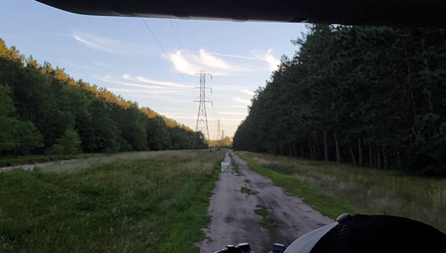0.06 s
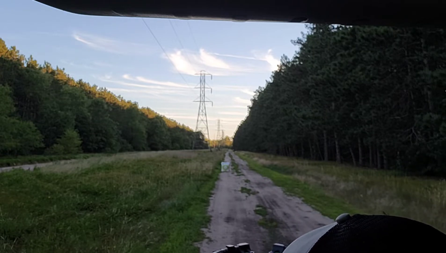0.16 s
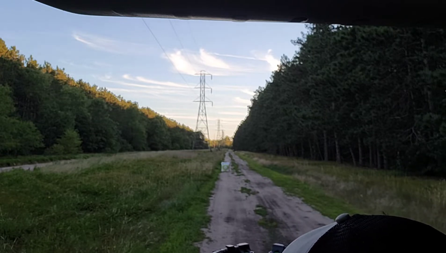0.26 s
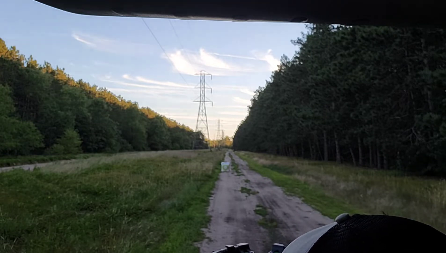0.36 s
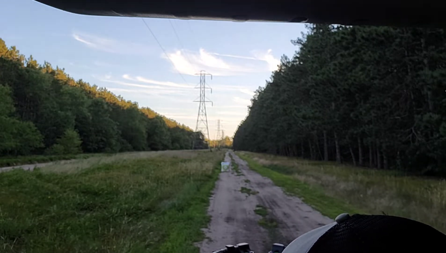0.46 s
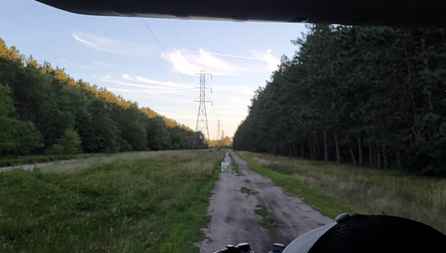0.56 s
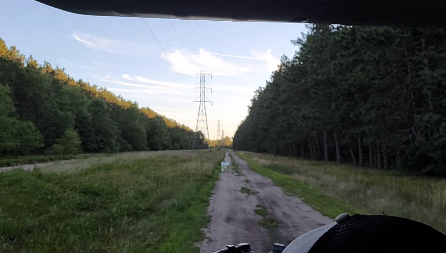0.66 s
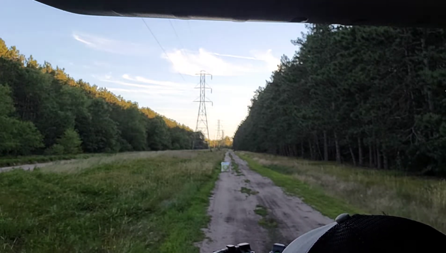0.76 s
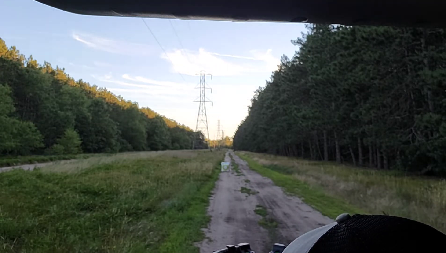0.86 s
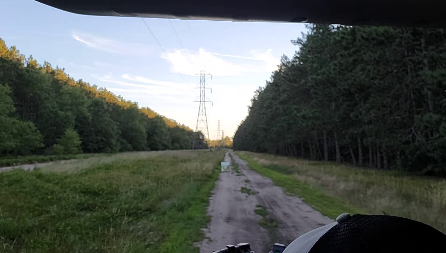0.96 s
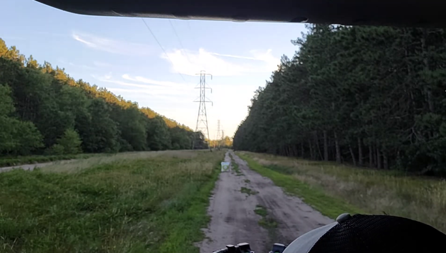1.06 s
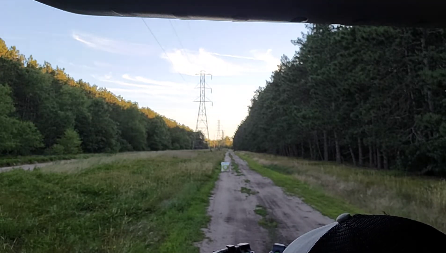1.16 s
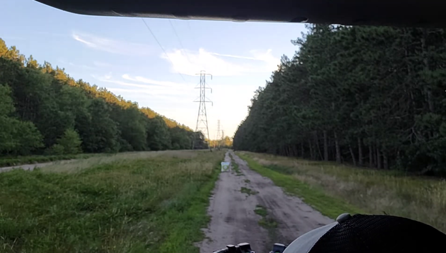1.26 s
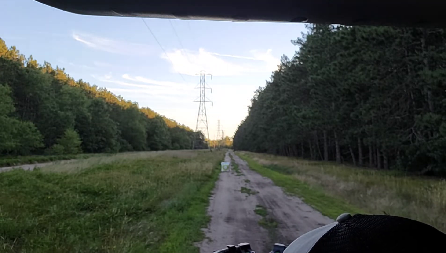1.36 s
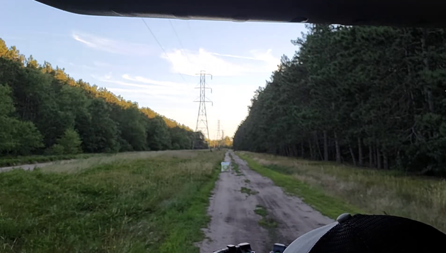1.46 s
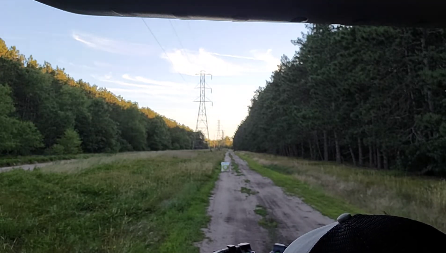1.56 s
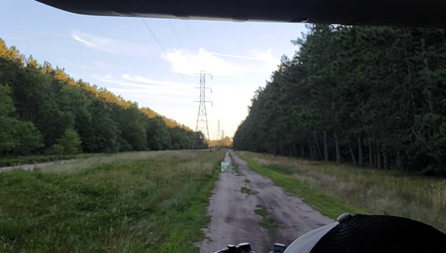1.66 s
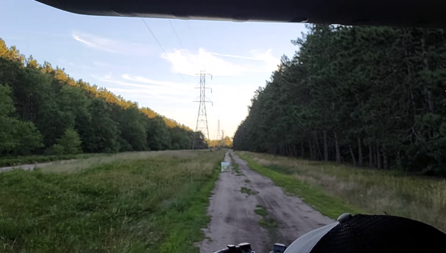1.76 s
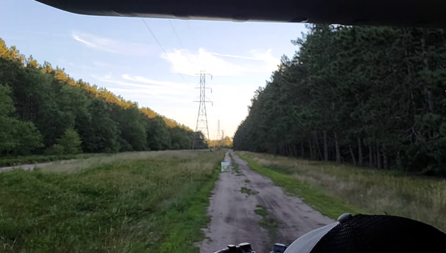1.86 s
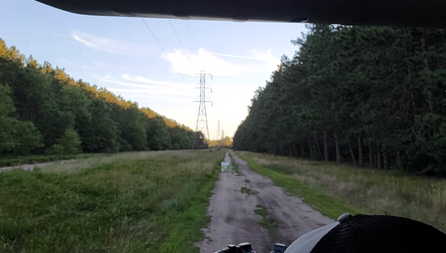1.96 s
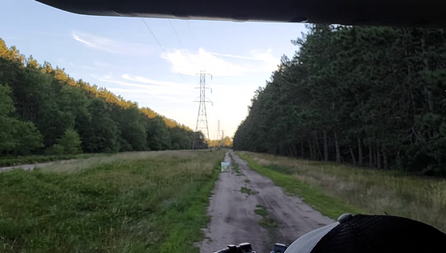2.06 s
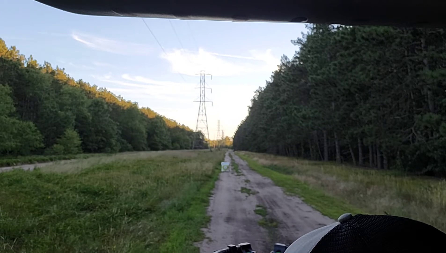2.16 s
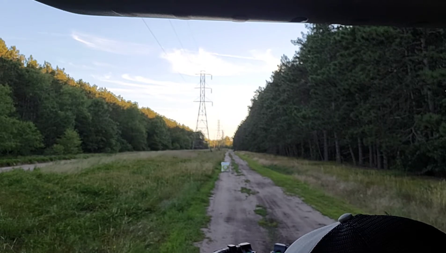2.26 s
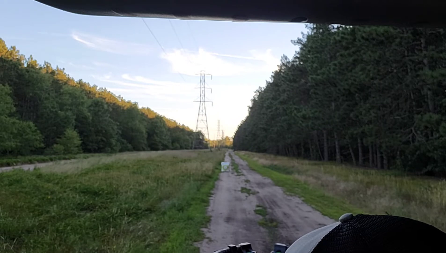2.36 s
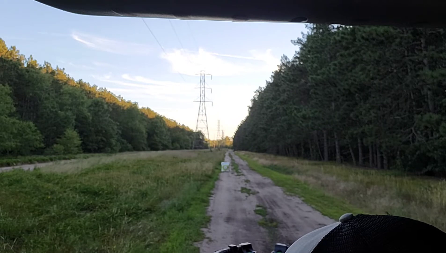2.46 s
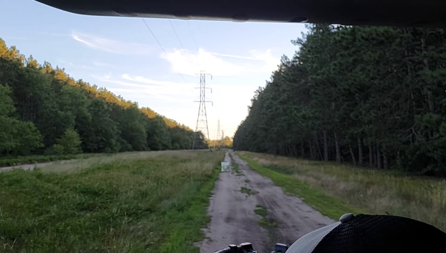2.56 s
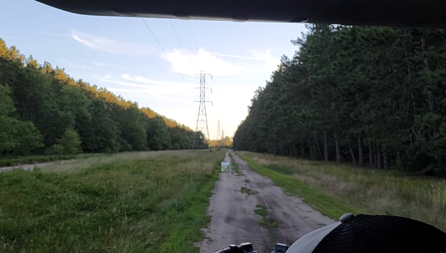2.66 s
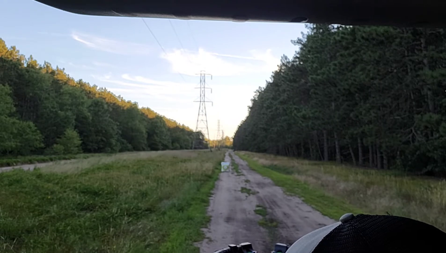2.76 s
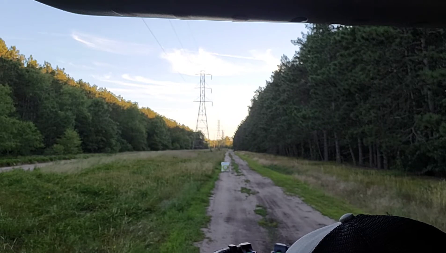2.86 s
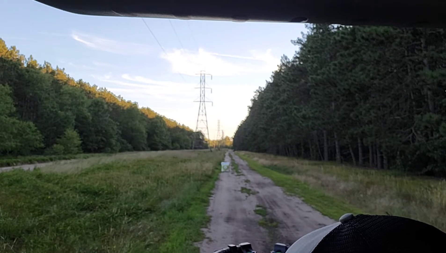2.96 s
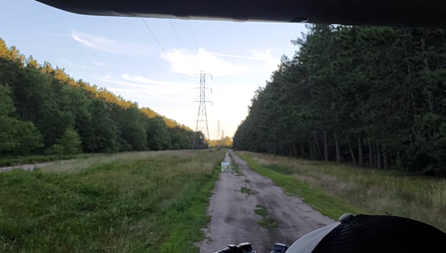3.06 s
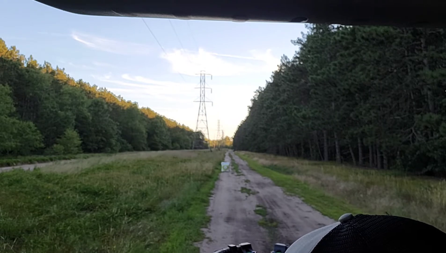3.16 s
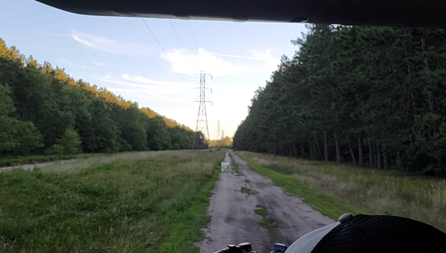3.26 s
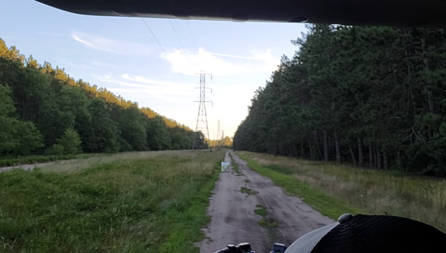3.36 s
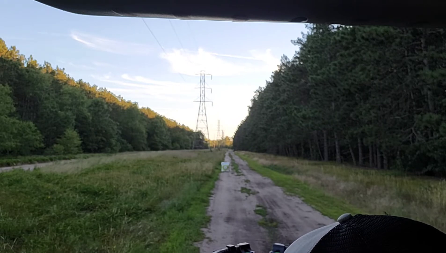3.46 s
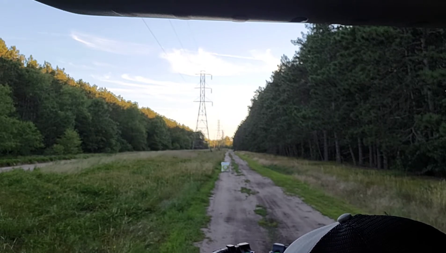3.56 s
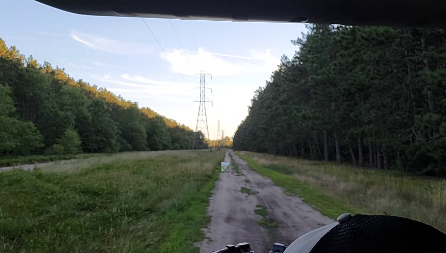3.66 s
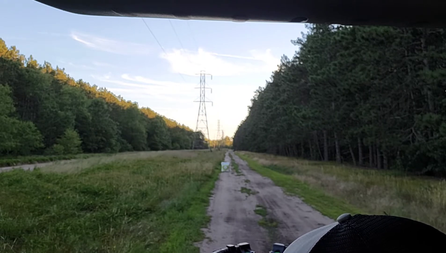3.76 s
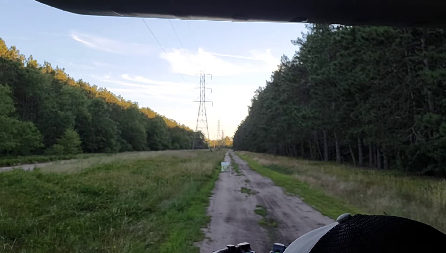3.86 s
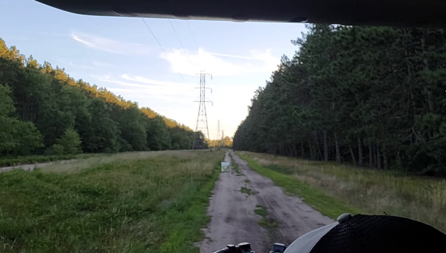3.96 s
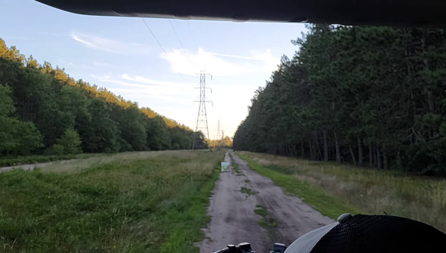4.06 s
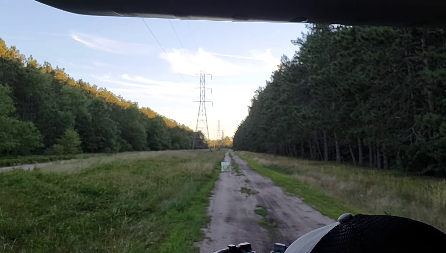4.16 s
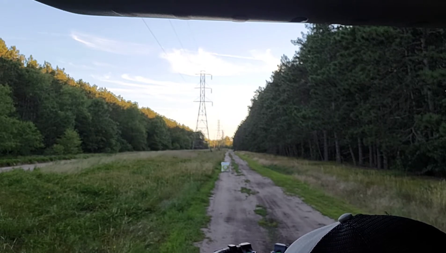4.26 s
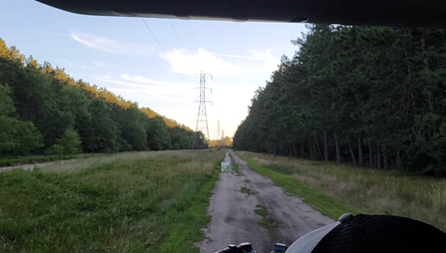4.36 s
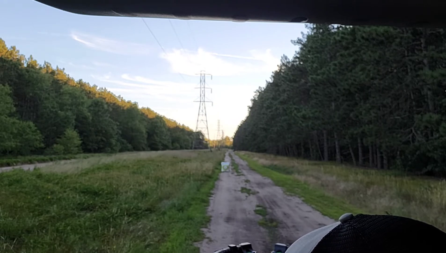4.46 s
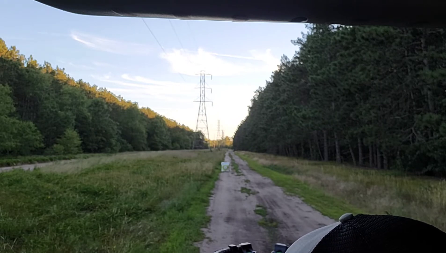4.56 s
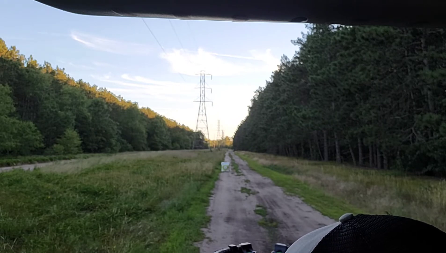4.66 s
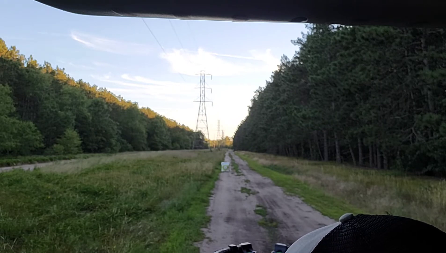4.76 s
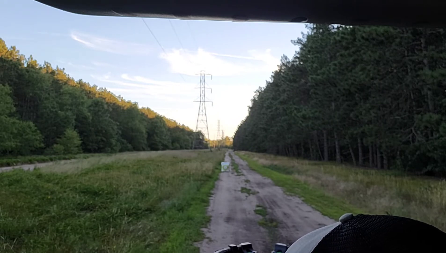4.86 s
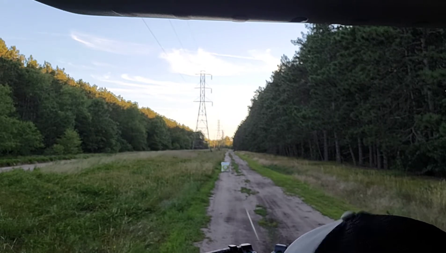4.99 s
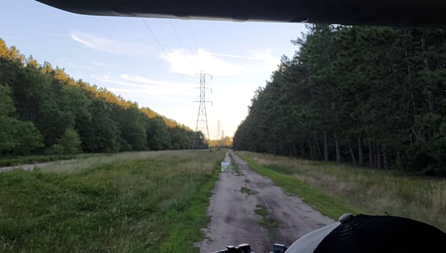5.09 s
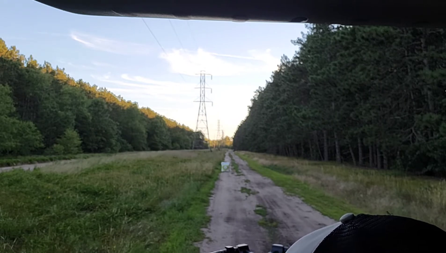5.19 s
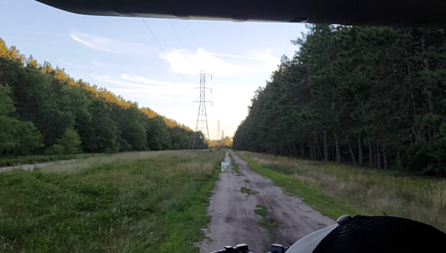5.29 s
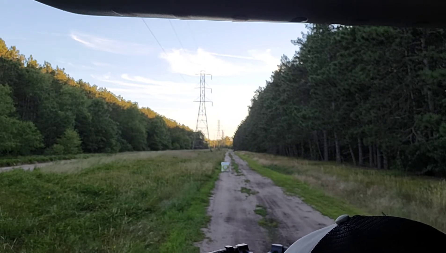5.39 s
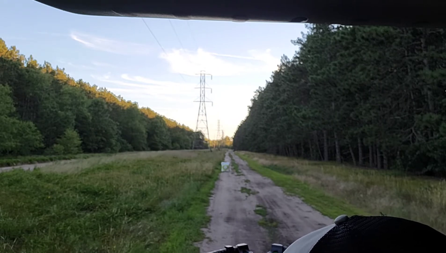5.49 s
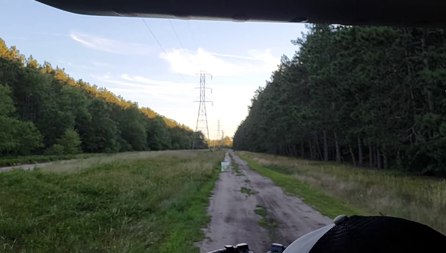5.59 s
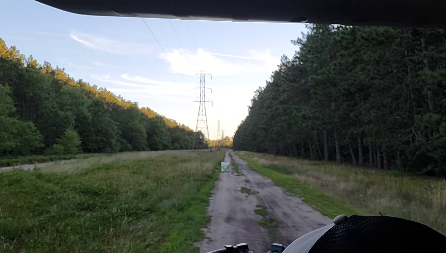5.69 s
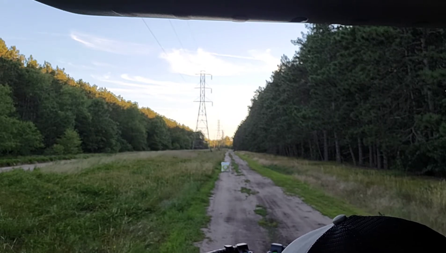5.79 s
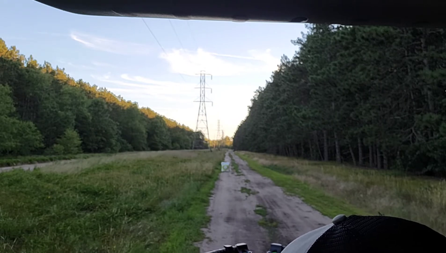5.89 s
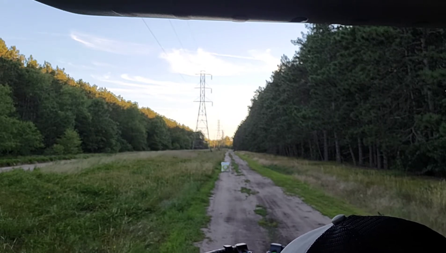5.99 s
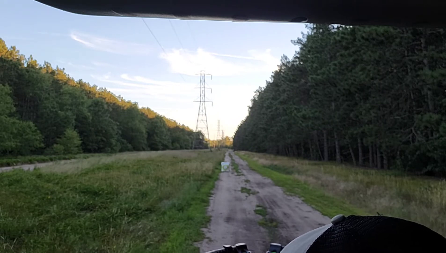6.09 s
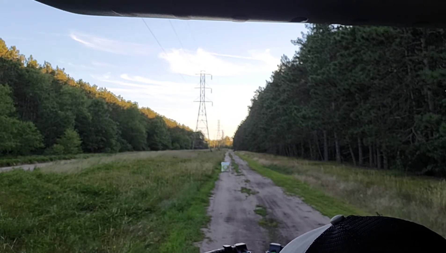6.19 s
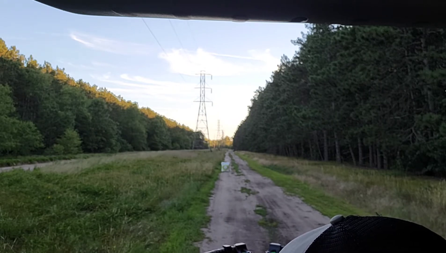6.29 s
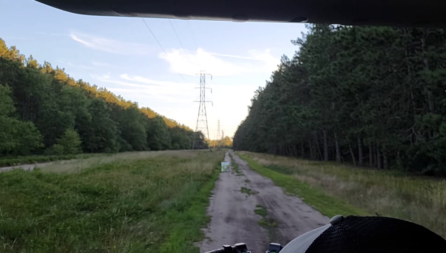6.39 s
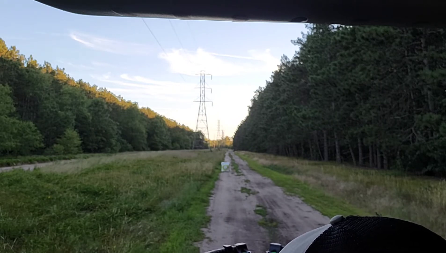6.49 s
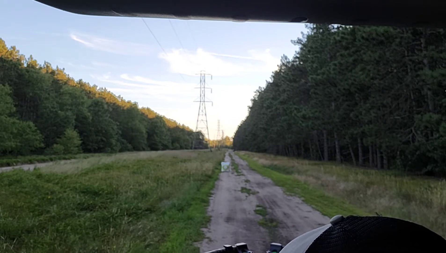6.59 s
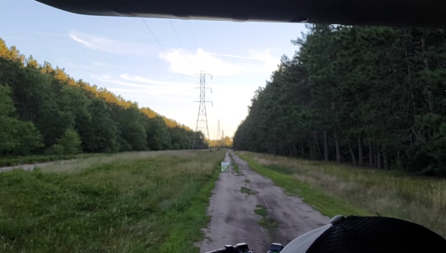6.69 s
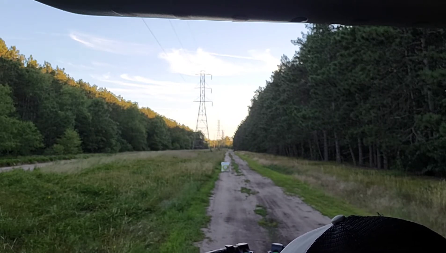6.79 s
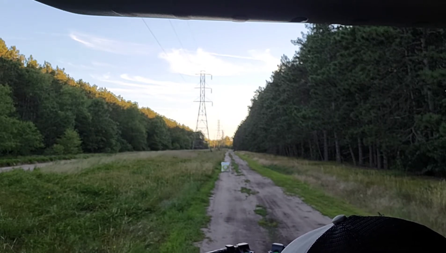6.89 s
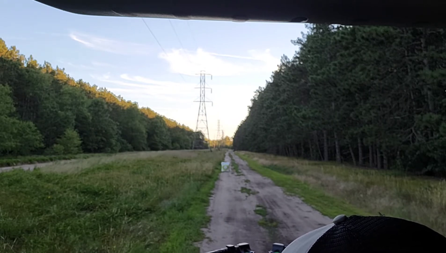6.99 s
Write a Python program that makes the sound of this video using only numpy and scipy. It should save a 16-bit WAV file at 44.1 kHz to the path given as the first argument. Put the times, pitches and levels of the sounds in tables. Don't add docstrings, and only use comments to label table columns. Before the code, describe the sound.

Outdoors in a grassy lane between trees, a parked two-cylinder engine putters low and unevenly under soft air hiss. A cricket chirps faintly and tiny gear ticks sound close to the microphone. After five seconds a crossbow fires with a loud, dry crack and woody knock; a third of a second later the bolt smacks a target. Echoes roll off the trees while the background dips, then slowly returns.

```python
import sys
import numpy as np
from scipy import signal
from scipy.fft import rfft, irfft
from scipy.io import wavfile

SR = 44100
rng = np.random.default_rng(int(sys.argv[2]) if len(sys.argv) > 2 else 0)


def volts_from_decibels(level):
    exponent = np.asarray(level, float) / 20
    return 10 ** exponent


def pcm_store(signal):
    levels = np.round(np.clip(np.atleast_2d(signal), -1, 1) * 32767)
    wavfile.write(sys.argv[1], SR, levels.astype(np.int16).T)


N = 310196
T = np.arange(N) / SR

# time in seconds, gain in dB.
DUCK = [
    (0, 4.5),
    (5.03, 4.5),
    (5.1, -7),
    (6.1, -6),
    (6.5, -1),
    (7.03, 2.5),
]
# frequency in Hz, likeness (1 = same on both sides).
FIELD_ALIKE = [(45, 0.99), (90, 0.69), (250, 1), (600, 0.14), (2000, 0.06), (6000, 0.071), (9000, 0.65)]


def rms_one(x):
    return x / np.sqrt(np.mean(x ** 2) + 1e-20)


def in_time(rows):
    s, *columns = np.transpose(rows)
    return [np.interp(T, s, c) for c in columns]


def at_hz(points, hz):
    return np.interp(np.log(hz), np.log(np.array(points)[:, 0]), np.array(points)[:, 1])


def drift(rate, count=1):
    r = np.exp(-200 * np.pi * rate / SR)
    steps = rng.standard_normal((count, N // 100 + 1002))
    slow = signal.lfilter([1], [1, -2 * r, r * r], steps)[:, 1000:]
    return np.array([np.interp(np.arange(N) / 100, np.arange(len(s)), rms_one(s)) for s in slow])


def coloured(spectrum, alike, size=N):
    hz = np.maximum(np.arange(size // 2 + 1) * SR / size, 1)
    mid, side = rfft(rng.standard_normal((2, size)))
    c = np.clip(at_hz(alike, hz), 0, 1)
    pair = np.sqrt(1 + c) * mid + np.sqrt(1 - c) * side * [[1], [-1]]
    pair = volts_from_decibels(at_hz(spectrum, hz)) * pair
    pair = pair * (hz > spectrum[0][0]) * (hz < spectrum[-1][0])
    return pair / np.std(irfft(pair, size)), hz


def noise(spectrum, alike):
    return irfft(coloured(spectrum, alike)[0], N)


def band(x, low, high, order=2):
    return signal.sosfilt(signal.butter(order, [low, high], "band", fs=SR, output="sos"), x)


def ring(clicks, hz, t60):
    r, w = volts_from_decibels(-60 / (t60 * SR)), 2 * np.pi * hz / SR
    return signal.lfilter([0, np.sin(w)], [1, -2 * r * np.cos(w), r * r], clicks + 1e-18)


def pan(db):
    return volts_from_decibels(np.array([[db / 2], [-db / 2]]))


def air_hiss():
    # frequency in Hz, level in dB per Hz.
    hiss_colour = [(1180, -23), (2000, -2), (2160, -4.5), (3090, -4), (6040, -8.5), (7440, -8.5),
                   (8700, -11), (10400, -9), (14500, -3), (16000, -5)]
    return volts_from_decibels(-86.5 + 0.68 * drift(2.8)) * noise(hiss_colour, FIELD_ALIKE) * pan(0.76)


def cloth_shift():
    # frequency in Hz, level in dB per Hz.
    rustle_colour = [(500, -46), (850, -13.5), (1020, 1), (1380, 3.5), (1510, -13.5), (1770, -4.5),
                     (2280, -28.5), (3200, -34), (4160, -65), (7040, -120)]
    # time in seconds, level in dB.
    shift = [
        (0, -70),
        (.04, -55.5),
        (.13, -60.5),
        (.225, -65),
        (.25, -71),
        (.5, -83.5),
        (.8, -130),
    ]
    return volts_from_decibels(in_time(shift)[0]) * noise(rustle_colour, FIELD_ALIKE)


def engine():
    # multiple of the cycle rate, level in dB.
    order_db = [(1, -34.5), (2, -12.5), (3, -25), (4, -1), (5, 4), (6, -3.5), (7, -1.5), (8, -10), (9, -3),
                (10, -3.5), (11, -9.5), (12, -10), (13, -25), (14, -11.5), (15, -15.5), (16, -17),
                (17, -22), (18, -24.5), (19, -26.5), (20, -21), (21, -17.5), (22, -13.5), (23, -17.5),
                (24, -9), (25, -27), (26, -14.5), (27, -19.5), (28, -14.5), (29, -27), (30, -27)]
    # frequency in Hz, level in dB per Hz.
    rumble_colour = [(15, -42.5), (25, -8.5), (98, -13.5), (123, -11), (233, -6.5), (355, -23), (417, -27),
                     (557, -11), (663, -15.5), (800, -25), (1040, -73.5), (1760, -120)]
    rattle_colour = [(470, -40), (800, -9), (1030, 1), (1160, -11.5), (1510, -17), (1690, -19),
                     (2000, -28.5), (3000, -44.5), (3900, -63), (6600, -120)]
    # time in seconds, loudness in dB, clearness of the air path in dB.
    drone = [(0, -42, -8.5), (.35, -42.5, -8.5), (.8, -45.5, 0.5), (1.15, -47, 2), (1.5, -46.5, 6.5),
             (1.9, -47, 2.5), (2.33, -49, 3.5), (2.7, -45.5, -1), (2.9, -45.5, 0.5), (3.35, -42.5, 4),
             (3.6, -44.5, 1.5), (3.9, -48.5, 2), (4.19, -48, -2), (4.45, -46, -2), (4.95, -48.5, -1),
             (5.9, -48, -2), (6.4, -46, -4), (7.03, -45, -7)]
    # offset in dB, extra share of the loudness swing, share of the clearness.
    growl = (-4, 0.22, -0.26)
    intake = (-12.5, 0.088, 1.0)
    clatter = (-26.5, .4, .7)
    # time in seconds, level in dB.
    panel = [
        (.522, -42),
        (.6, -51.5),
        (.93, -45.5),
        (1.48, -46),
    ]
    cycle_hz, hunt = 23.39, .0015
    wander_db, sway, smear = 1.9, .8, .03
    rough_db, gate, intake_gate = -6, 1.4, 3.2
    second_firing = 1.2

    loud_db, clear_db = in_time(drone)
    boom_db = loud_db + 1.104 * (in_time(DUCK)[0] - DUCK[0][1])
    growl_db, intake_db, rattle_db = (
        boom_db + db + swing * (loud_db + 46) + clear * clear_db
        for db, swing, clear in (growl, intake, clatter))

    loose = np.clip(.22 * (-41 - loud_db), .45, 1.6)
    fades = drift(1.5, count=len(order_db))
    slips = drift(0.28, count=len(order_db))
    bend = .012 * drift(.4)[0]
    turn = 2 * np.pi * np.cumsum(cycle_hz * (1 + hunt * rms_one(bend))) / SR + 1.7
    tones = np.zeros((3, N))
    for (k, db), fade, slip in zip(order_db, fades, slips):
        lag = np.pi + second_firing * (k % 2) + (smear + bend) * (k - 6) ** 2 + sway * loose * slip
        level = volts_from_decibels(db + wander_db * (1 + k / 25) * fade)
        tones[int(k > 7) + int(k > 17)] += level * np.cos(k * turn + lag)

    rumble = noise(rumble_colour, FIELD_ALIKE)
    uneven = drift(15)[0]
    firing = np.cos(2 * turn + 0.65) + .4 * np.cos(turn)
    levels, gates = (boom_db, growl_db, intake_db), (gate, gate, intake_gate)
    edges = ((30, 180), (180, 470), (400, 520))
    out = 0
    for tone, db, (low, high), depth in zip(tones, levels, edges, gates):
        puffs = volts_from_decibels(depth * firing + .9 * uneven)
        rough = rms_one(puffs * band(rumble, low, high))
        out = out + volts_from_decibels(db) * (rms_one(tone * np.sqrt(puffs)) + volts_from_decibels(rough_db) * rough)

    rattle = volts_from_decibels(rattle_db + 1.2 * drift(2.7)) * rms_one(np.sqrt(puffs) * noise(rattle_colour, FIELD_ALIKE))
    knocks = np.zeros(N)
    knocks[[round(s * SR) for s, db in panel]] = volts_from_decibels(np.array(panel)[:, 1])
    soft_knocks = signal.lfilter([.02], [1, -.98], knocks)
    out = out + ring(soft_knocks, 565, 0.3) * 4
    return (out + rattle) * pan(1.8)


def cricket():
    # chirp start in seconds, level in dB, pitch in Hz.
    chirps = [
        (-.101, -82.5, 4720),
        (0.62, -80.5, 4802),
        (1.163, -80.5, 4810),
        (1.894, -81, 4810),
        (2.265, -78.5, 4805),
        (3.263, -79.5, 4800),
        (3.99, -78.5, 4840),
        (4.392, -78.5, 4850),
        (6.779, -81.5, 4800),
    ]
    # delay in seconds, level in dB.
    strokes = [
        (0, -4),
        (.044, 4),
        (.093, 6),
        (.143, -15),
        (.188, -13),
    ]
    # start in seconds, level in dB, pitch in Hz.
    false_start = (6.738, -92, 4740)
    stroke_s, grass_db, rasp = .042, -5.5, .3

    calls = [(*chirp, strokes) for chirp in chirps]
    calls.append((*false_start, [(0.0036, 0.00092)]))
    waver = 1.25 * drift(60)[0]
    out = np.zeros(N)
    for s, db, hz, call_strokes in calls:
        for delay, stroke_db in call_strokes:
            u = np.clip((T - s - delay) / stroke_s, 0, 1)
            swell = np.sin(np.pi * u ** .6) ** 2
            tone = np.sin(2 * np.pi * hz * (1 + .1 * delay) * T + waver)
            out += volts_from_decibels(db + stroke_db + 10) * swell * tone

    teeth = band(rng.standard_normal(N), 150, 550)
    out = band(out * (1 + rasp * rms_one(teeth)), 4350, 5450, order=3)
    lag = T[:SR // 2]
    echoes = rng.standard_normal((2, len(lag))) * volts_from_decibels(-60 * lag / .5)
    echoes = echoes / np.sqrt(np.sum(echoes[0] ** 2))
    wet = signal.fftconvolve(out[None], echoes, axes=1)[:, :N]
    return 0.57 * out + volts_from_decibels(grass_db) * wet


def gear_ticks():
    # time in seconds, peak in dB, left over right in dB.
    tick_rows = [(0.7204, -75, -5), (1.989, -68, 0), (2.826, -77, -2), (3.3277, -71, 1), (3.404, -68.5, -4),
                 (3.425, -70, 1.5), (4.1578, -66, 6), (4.49, -73, 5)]
    bright = band(rng.standard_normal(N), 4500, 15000)
    out = 0
    for s, db, lr in tick_rows:
        fade = (T >= s) * volts_from_decibels(-60 * np.abs(T - s) / .02)
        out = out + volts_from_decibels(db - 2) * pan(lr) * bright * fade
    return out


def causal(x, spectrum, balance):
    size = 4096
    hz = np.maximum(np.arange(size // 2 + 1) * SR / size, 1)
    side_db = at_hz(spectrum, hz) + at_hz(balance, hz) * [[.5], [-.5]]
    cepstrum = irfft(np.log(volts_from_decibels(side_db)))
    cepstrum[:, 1:size // 2] *= 2
    cepstrum[:, size // 2 + 1:] = 0
    pulse = irfft(np.exp(rfft(cepstrum)))
    return signal.fftconvolve(x, pulse / np.sqrt(np.sum(pulse ** 2) / 2), axes=1)[:, :N]


def struck(blows, colour, modes, spread_db, alike):
    # frequency in Hz, left over right in dB.
    shading = [(60, 7), (130, 0), (290, 1), (640, 4), (1410, 2.5), (3100, 3.5), (6820, 0), (15000, -4)]
    contacts = volts_from_decibels(spread_db * rng.standard_normal(N // 12 + 1)).repeat(12)[:N]
    mid, side = rng.standard_normal((2, N)) * contacts
    burst, thuds = np.zeros((2, 2, N))
    for s, crack_db, thud_db, t60, lr in blows:
        burst += (volts_from_decibels(crack_db - 60 * np.abs(T - s) / t60) * (T >= s) * pan(lr)) ** 2
    at = [round(b[0] * SR) for b in blows]
    blow_db = np.array(blows)[:, 2]
    for hz, db, t60 in modes:
        clicks = np.zeros((2, N))
        chance_db = rng.normal(0, 3.5, (len(at), 2)).T
        clicks[:, at] = volts_from_decibels(blow_db + db + chance_db) * rng.choice([-1, 1], len(at))
        thuds += ring(signal.lfilter([.2], [1, -.8], clicks), hz, t60)
    crack = (mid + np.clip(1 - alike, 0, 1) * side * [[1], [-1]]) * np.sqrt(burst)
    return causal(crack, colour, shading) + thuds


def crossbow_shot():
    # time in seconds, crack in dB, thud in dB, crack's 60 dB fade in seconds, left over right in dB.
    blow_rows = [
        (5.0266, -25, -31, 0.055, -6.5),
        (5.0278, -10, -34, 0.017, 1),
        (5.0305, -15.5, -31.5, .02, 5.5),
        (5.035, -17, -14.5, 0.064, 3.5),
        (5.038, -15.5, -21.5, 0.036, 2),
        (5.0427, -10.5, -29, 0.036, 3),
        (5.048, -18, -22, 0.024, 0),
        (5.052, -20, -24.5, 0.04, 1),
        (5.058, -29, -24.5, 0.062, -1),
    ]
    # frequency in Hz, level in dB per Hz.
    crack_colour = [(530, -38.5), (900, -8.5), (1030, -7.5), (1470, -6), (1950, -1.5), (2680, -11.5),
                    (3390, -9), (3690, -1.5), (5470, -11.5), (7340, 1.5), (9260, -17), (12700, -2),
                    (14200, 0.5), (15100, -2.5), (16900, -47)]
    # frequency in Hz, level in dB, 60 dB fade in seconds.
    limbs = [(60, -27.5, 0.16), (223, -9, 0.064), (290, -9, 0.032), (336.6, 0, 0.041), (376, -7, 0.031),
             (485, -5.5, 0.057), (595, -3, 0.072), (621.5, -9, 0.083), (1013, -16, 0.087), (1310, -7, .04),
             (1750, -5, .03), (1830, -6, .03)]
    return struck(blow_rows, crack_colour, limbs, spread_db=1.0, alike=0.11)


def tree_echo():
    # frequency in Hz, level in dB per Hz.
    shot_colour = [(180, -26.5), (300, -0.5), (504, -6.5), (539, -5), (660, -9.5), (907, -15),
                   (2480, -10.5), (6030, -7), (7630, -1), (9650, -16.5), (13700, 0), (15600, -5),
                   (16000, -33.5)]
    impact_colour = [(180, -32.5), (300, -12), (600, -3), (820, -25.5), (1300, -10.5), (2400, -5.5),
                     (3400, -7.5), (5200, -14.5), (6500, -10), (7500, -1.5), (8600, -13), (9800, -15.5),
                     (12500, -8.5), (15000, -12.5), (16000, -43)]
    # frequency in Hz, 60 dB fade in seconds.
    trees_t60 = [(300, 0.75), (1000, 1.5), (2000, 1.4), (3200, 0.8), (4800, 0.68), (7500, 0.56),
                 (10000, .6), (13000, 0.4), (16000, .45)]
    # start in seconds, level in dB, swell in seconds, extra level of the nearest trunks in dB.
    echo_rows = [
        (5.039, -36, 0.012, 13),
        (5.337, -48.5, 0.015, 16.5),
    ]
    size, start = 2 * SR, 5 * SR
    out, t = np.zeros((2, N)), T[start:start + size]
    edges = 170 * 2 ** np.arange(0, 7, .25)
    for (s, db, swell, near_db), colour in zip(echo_rows, (shot_colour, impact_colour)):
        pair, hz = coloured(colour, FIELD_ALIKE, size=size)
        since = np.maximum(t - s, 0)
        shape = (1 - np.exp(-since / swell)) * (1 + volts_from_decibels(near_db - 60 * since / 0.17))
        for low, high in zip(edges, edges[1:]):
            fade = volts_from_decibels(db - 60 * since / at_hz(trees_t60, low)) * shape
            out[:, start:start + size] += fade * irfft(pair * (hz >= low) * (hz < high), size)
    return out


def bolt_impact():
    # time in seconds, crack in dB, thud in dB, crack's 60 dB fade in seconds, left over right in dB.
    impact_rows = [
        (5.3333, -8, -25, 0.004, 2),
        (5.3345, -22.5, -81, 0.016, -0.5),
        (5.339, -38.5, -54, .03, 5),
    ]
    # frequency in Hz, level in dB per Hz.
    smack_colour = [(530, -43.5), (900, -12.5), (1250, -3.5), (1580, -8), (3220, -4), (3690, -13.5),
                    (4220, -9), (6410, -7), (7430, 4.5), (8610, -1), (12000, -0.5), (15900, -12.5),
                    (16900, -27.5)]
    # frequency in Hz, level in dB, 60 dB fade in seconds.
    target = [(210, -10.5, 0.1), (380, -3, 0.014), (560, -1.5, 0.041), (1191, -4, 0.02)]
    return struck(impact_rows, smack_colour, target, spread_db=5.0, alike=0.69)


def scene():
    ducked_hiss = volts_from_decibels(in_time(DUCK)[0]) * air_hiss()
    quiet = ducked_hiss + cloth_shift() + cricket() + gear_ticks()
    return quiet + engine() + crossbow_shot() + tree_echo() + bolt_impact()


def roll_off(x):
    return signal.sosfilt(signal.butter(12, 17050, fs=SR, output="sos"), x)


def record(dry):
    dry = signal.sosfilt(signal.butter(4, 40, "high", fs=SR, output="sos"), dry)
    dry = dry * np.clip((T[-1] - T) / .004, 0, 1)
    mix = 0.97 * np.tanh(dry / 0.9)
    return roll_off(mix)


dry = scene()
out = record(dry)
pcm_store(out)
```